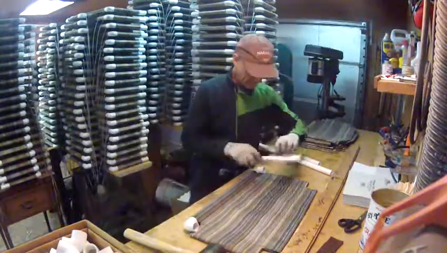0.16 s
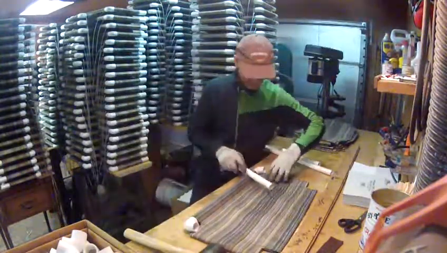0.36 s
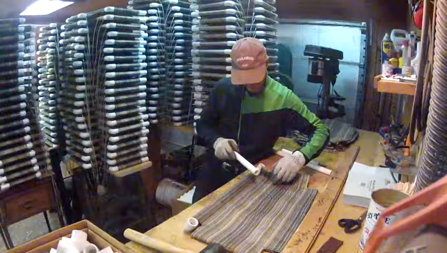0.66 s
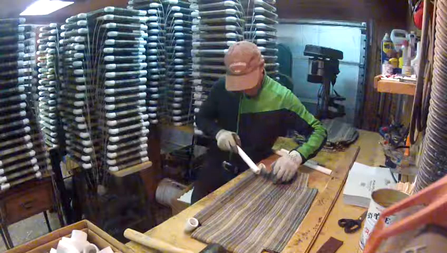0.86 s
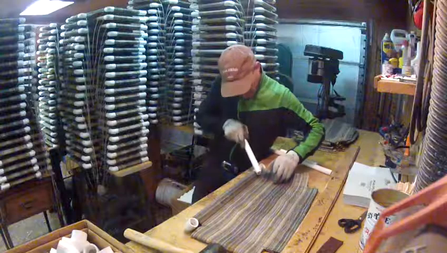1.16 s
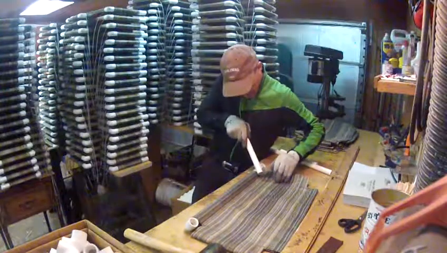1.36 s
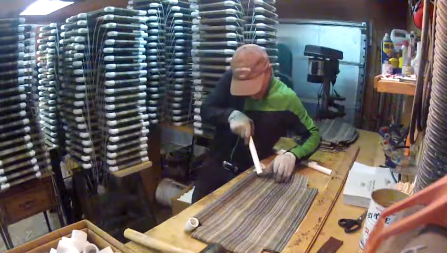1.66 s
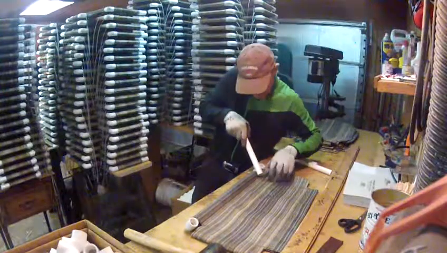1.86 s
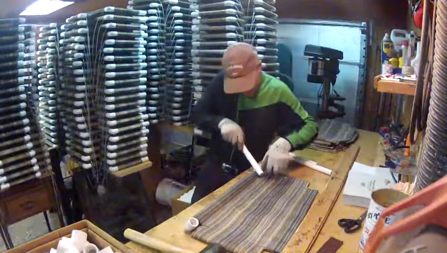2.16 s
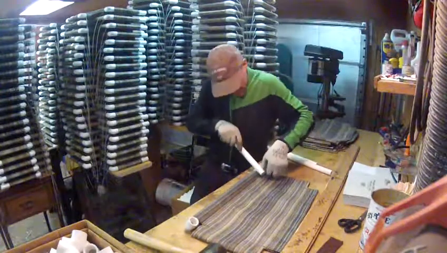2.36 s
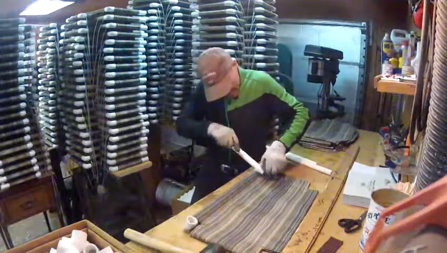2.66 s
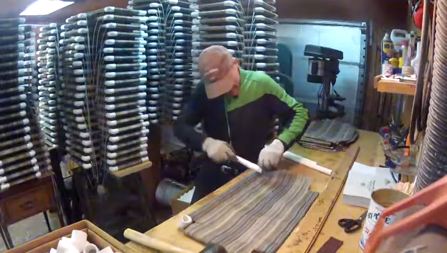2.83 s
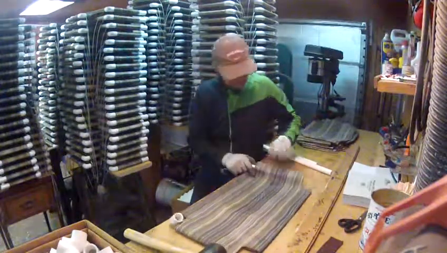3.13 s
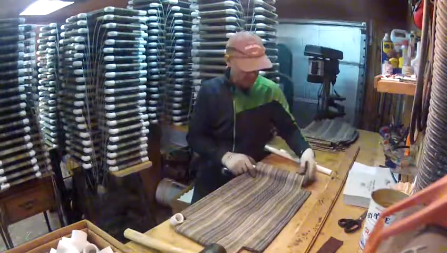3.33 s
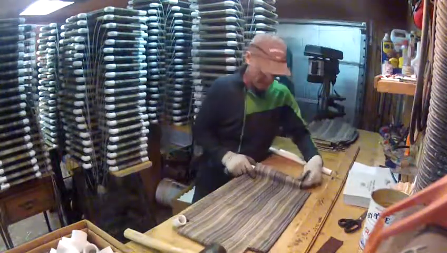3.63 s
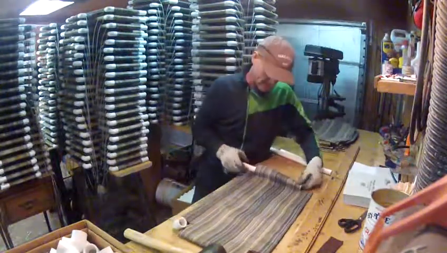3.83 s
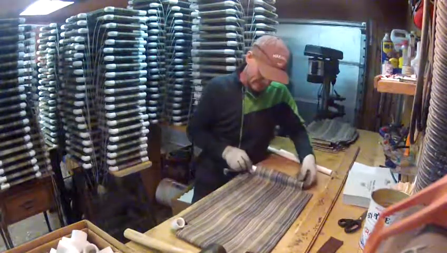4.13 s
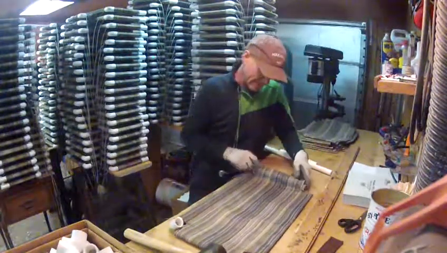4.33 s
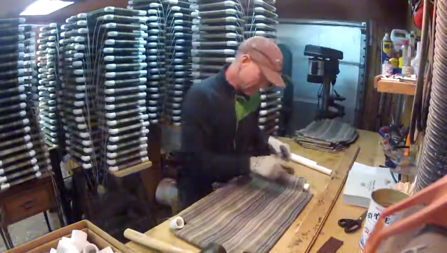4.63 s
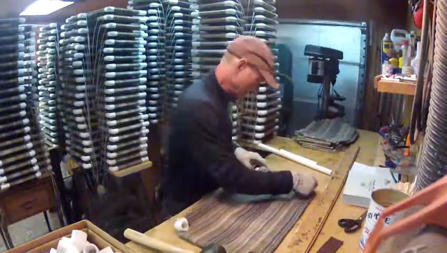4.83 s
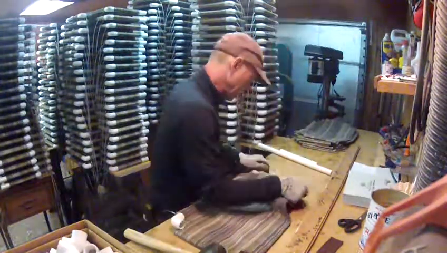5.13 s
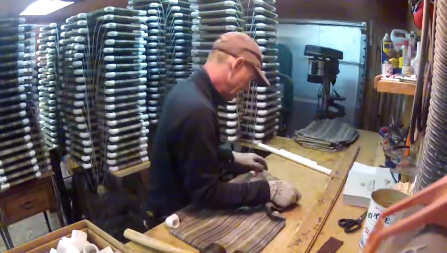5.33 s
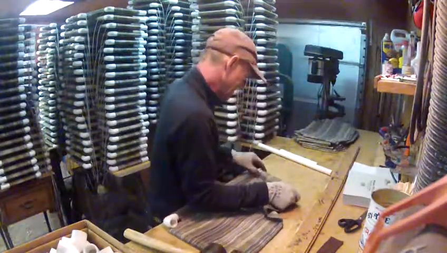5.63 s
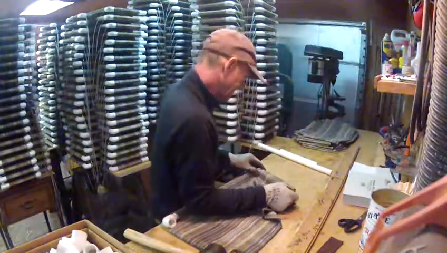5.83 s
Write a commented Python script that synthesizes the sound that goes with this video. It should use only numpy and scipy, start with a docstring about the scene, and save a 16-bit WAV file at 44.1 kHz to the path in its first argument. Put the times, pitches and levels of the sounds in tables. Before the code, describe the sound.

A small workshop with a faint low hum and soft hiss, heard through a cheap microphone with gritty, brittle treble and short room echoes. At 0.4 s a hollow plastic pipe hits a wooden bench in a loud, tight clatter, the strongest sound, followed by a weaker knock at 0.55 s. From 0.6 to 2.7 s it is mostly quiet: faint ticks, soft taps around 1.3 and 2.0 s, and a small click near 2.4 s. At about 2.8 s something drags over wood, and a brief hissy cloth swish at 2.9-3.0 s ends with a hollow knock. Small taps and rustles follow, with a woody tap at 3.8 s. At 4.1 s comes a sharp, loud plastic knock with a quick rebound. A thud at 4.8 s leads to a busy cluster at 5.05-5.2 s of hard clicks, a hollow clink, scraping and thumps. Light taps and shuffling continue to the end, near 6 s.

```python
"""Plastic pipes on a workbench

Plastic pipes are knocked, set down and pushed through a cloth sleeve on a wooden bench in a small workshop.
Each blow rings the planks, frame and pipe with a short burst of force, and ticks are snaps of noise.
Dragging, rustling and scraping are made of many tiny slips; hum and hiss lie below, and the hits echo.
A cheap camera samples slowly and holds each value, which adds mirrored treble.
"""
import sys
import numpy as np
from scipy import signal
from scipy.fft import rfft, irfft
from scipy.io import wavfile
from scipy.ndimage import uniform_filter1d

SR = 44100
rng = np.random.default_rng(int(sys.argv[2]) if len(sys.argv) > 2 else 0)


def transcribe(signal):
    """Save signal, clipped to [-1, 1], as a 16-bit WAV file at the path in sys.argv[1]."""
    frames = np.atleast_2d(signal).T
    limited = np.clip(frames, -1, 1)
    pcm = np.round(limited * 32767).astype(np.int16)
    wavfile.write(sys.argv[1], SR, pcm)


N = 264026  # length in samples


def gain_of(db):
    """Turns decibels into amplitude."""
    return 10 ** (np.asarray(db) / 20)


def evened(x):
    """Scales a sound to an rms of 1."""
    return x / np.sqrt(np.mean(x ** 2) + 1e-20)


def read(points, hz):
    """Reads a table of values over pitch at the pitches hz, in straight lines over log pitch."""
    pitch_hz, value = np.transpose(points)
    return np.interp(np.log(hz + 1), np.log(pitch_hz + 1), value)


def coloured(x, points):
    """Gives x a spectrum, keeping the energy of white input."""
    gain = gain_of(read(points, np.fft.rfftfreq(len(x), 1 / SR)))
    return irfft(rfft(x) * evened(gain), len(x))


def add(mix, start_s, sound):
    """Mixes a sound in at its start time."""
    part = mix[round(start_s * SR):][:len(sound)]
    part += sound[:len(part)]


def stroke(start_s, hold_s, level_db, rise_db_per_s, fall_db_per_s):
    """Loudness of one movement: it swells until its start, holds, then fades."""
    t = np.arange(N) / SR
    before_s = np.maximum(start_s - t, 0)
    after_s = np.maximum(t - start_s - hold_s, 0)
    return gain_of(level_db - rise_db_per_s * before_s - fall_db_per_s * after_s)


def grit(per_s, spread_db):
    """Sparse slips of uneven size and random direction."""
    size = gain_of(spread_db * np.minimum(rng.exponential(1, N), 5))
    direction = rng.choice([-1., 1.], N)
    happens = rng.random(N) < per_s / SR
    return evened(size * direction * happens)


def body(modes, weight=lambda hz: 1):
    """How a body rings after one sharp push: a sum of fading tones (modes)."""
    hz, level_db, t60_s = np.transpose(modes)[:, :, None]
    t = np.arange(SR // 4) / SR
    sign = (-1.) ** (np.arange(len(modes))[:, None] // 2)  # pairs of neighbours in opposite phase
    fading = gain_of(level_db - 60 * t / np.maximum(t60_s, .01))
    rings = sign * weight(hz) * fading * np.sin(2 * np.pi * hz * t)
    build_up = 1 - np.exp(-t * hz / 0.32)  # over about a cycle
    fade_out = np.cos(2 * np.pi * t)  # silent after a quarter second
    return (rings * build_up).sum(0) * fade_out / np.sqrt(len(modes))


def ring(force, modes):
    """A long force sets a body ringing."""
    return evened(signal.oaconvolve(force, body(modes))[:N])


# colour of the workshop hum and hiss: pitch_hz, level_db (per Hz, only the shape counts)
AIR_COLOUR = [(12, -27.5), (20, -8), (48, 4), (74, -5), (111, -4), (175, -11.5), (275, -12), (366, -18.5),
              (393, -49.5), (476, -11), (511, -28.5), (1460, -27.5), (2460, -33), (4690, -32.5),
              (5950, -46), (7740, -98), (13100, -120)]
AIR_DB = -57


def air():
    """The steady hum and hiss of the workshop: coloured noise that swells slightly."""
    swell = evened(uniform_filter1d(uniform_filter1d(rng.standard_normal(N), 6000), 6000))
    noise = evened(coloured(rng.standard_normal(N), AIR_COLOUR))
    return gain_of(AIR_DB + 0.27 * swell) * noise


# strokes of hands, pipe and cloth over the bench: start_s, hold_s, drag_db (on wood), rustle_db (of cloth)
STROKES = [(0.0, 0.16, -57, -65.5), (0.512, 0.023, -59, -62), (1.216, 0.11, -69, -73.5),
           (1.9, 0.16, -63, -80), (2.799, .17, -40, -65.5), (3.053, 0.015, -42.5, -83.5),
           (3.647, 0.032, -52.5, -68), (3.768, 0.033, -45, -57.5), (4.211, .17, -48, -63),
           (4.684, 0.11, -59.5, -70), (4.85, 0.31, -52.5, -65), (5.095, 0.078, -42, -64),
           (5.27, 0.087, -55.5, -90), (5.564, 0.12, -52, -71.5)]
# ringing of the bench planks: pitch_hz, level_db, t60_s (time to fade by 60 dB)
BENCH = [(205.5, -7, 0.097), (251.3, -9, 0.16), (274, 2.5, 0.092), (323.6, -4.5, 0.058), (365, -2.5, 0.063),
         (403.5, -3.5, 0.052), (470.4, -1, 0.065)]
# ringing of the bench frame: pitch_hz, level_db, t60_s
BOOM = [(52.2, -2.5, .17), (58.3, -3, 0.26), (90, -11.5, 0.027), (113, -5.5, 0.41), (152.7, -2, 0.12),
        (175, -8, 0.1215)]
# ringing of the hollow plastic pipe: pitch_hz, level_db, t60_s
PIPE = [(452.6, 8.5, .06), (519, 8.5, 0.048), (599, 1, 0.093), (644.4, 3.5, 0.042), (725.5, 4, 0.027),
        (795, 2, 0.03), (886, -4, .06), (888, -9.5, 0.031), (945, -6, 0.035), (1008, 1.5, 0.035),
        (1169, -4, .05), (1267, -3, 0.038), (1370, -2.5, 0.013), (1542, -5, 0.022), (1830, -10.5, .02),
        (2180, -10.5, 0.016), (2800, -16, .015)]
RISE_DB_PER_S, FALL_DB_PER_S = 243.5, 138
REST_DRAG_DB = -59  # between strokes


def drag():
    """Things drag over the wood: uneven slips shake the planks, the frame and the pipe."""
    slips = grit(per_s=900, spread_db=-3.5)
    effort = gain_of(REST_DRAG_DB)
    for start_s, hold_s, drag_db, _ in STROKES:
        effort = effort + stroke(start_s, hold_s, drag_db, RISE_DB_PER_S, FALL_DB_PER_S)
    return effort * evened(ring(slips, BENCH) + 1.02 * ring(slips, BOOM) + 0.44 * ring(slips, PIPE))


# colour of the cloth shifting about: pitch_hz, level_db (per Hz, only the shape counts)
WEAVE = [(500, -22.5), (1000, -2), (2000, -4), (3500, -6), (4700, -1.5), (5600, 0), (7000, -42)]
# colour of the cloth as the pipe is pushed into the sleeve: pitch_hz, level_db (per Hz, only the shape counts)
CLOTH = [(700, -22), (1200, -13), (2000, -16), (3000, -7), (3900, -10), (4400, -2), (4750, 2.5), (5100, -7),
         (5600, -1), (7000, -22)]
REST_RUSTLE_DB, CLOTH_FALL_DB_PER_S = -75.5, 60
# the push into the sleeve swells, holds and dies
SWISH_START_S, SWISH_HOLD_S, SWISH_DB = 2.918, 0.079, -34.5
SWISH_RISE_DB_PER_S, SWISH_FALL_DB_PER_S = 244.5, 234


def rustle():
    """Dense fibre slips make a hiss that flutters as the weave catches."""
    flutter = evened(uniform_filter1d(rng.standard_normal(N), 300))
    slips = grit(per_s=3600, spread_db=-3.0)
    push = stroke(SWISH_START_S, SWISH_HOLD_S, SWISH_DB, SWISH_RISE_DB_PER_S, SWISH_FALL_DB_PER_S)
    shift = gain_of(REST_RUSTLE_DB)
    for start_s, hold_s, _, rustle_db in STROKES:
        shift = shift + stroke(start_s, hold_s, rustle_db, RISE_DB_PER_S, CLOTH_FALL_DB_PER_S)
    cloth = push * evened(coloured(slips, CLOTH)) + shift * evened(coloured(slips, WEAVE))
    return gain_of(0.74 * flutter) * cloth


# small dry ticks of plastic and seams: start_s, level_db, pitch_hz
TICKS = [(0.13, -46.5, 3200), (0.566, -40.5, 4420), (0.6187, -48.5, 2330), (0.9075, -55.5, 1725),
         (0.9977, -58.5, 2070), (1.042, -57.5, 1534), (1.5633, -53.5, 4870), (1.867, -52, 1340),
         (2.808, -51.5, 4470), (3.3595, -64.5, 1360), (3.5671, -42, 1360), (4.071, -51, 2300),
         (4.1787, -42, 4420), (4.269, -43, 1410), (4.705, -50.5, 2500), (4.7517, -47, 1800),
         (5.0292, -35.5, 2660), (5.105, -45, 3300)]
# colour of hard, dry contact noise: pitch_hz, level_db (per Hz, only the shape counts)
TICK_COLOUR = [(710, -20.5), (1200, -21), (1630, -4.5), (2000, -6), (3280, -3), (3580, -3), (4960, -1.5),
               (5900, -4.5), (7670, -70.5), (13000, -120)]
SNAP_DB = -7.5  # noise of a tick against its ring
OVERTONE, OVERTONE_DB = 1.8, -5  # second tone of the ring: pitch ratio, level


def ticks():
    """Each tick is a snap of noise with a very short ring of the plastic."""
    tones, snap_train, t = np.zeros(N), np.zeros(N), np.arange(1200) / SR
    snaps = rng.standard_normal((len(TICKS), 1200))
    for (start_s, level_db, pitch_hz), snap in zip(TICKS, snaps):
        first = np.sin(2 * np.pi * pitch_hz * t)
        second = gain_of(OVERTONE_DB) * np.sin(2 * np.pi * OVERTONE * pitch_hz * t)
        add(tones, start_s, gain_of(level_db) * (first + second) * np.exp(-t / 0.00174))
        add(snap_train, start_s, gain_of(level_db + SNAP_DB) * snap * np.exp(-t / 0.0052))
    return tones + coloured(snap_train, TICK_COLOUR)


# how long the echoes last: pitch_hz, t60_s
ROOM = [(60, .3), (250, 0.31), (1000, 0.28), (3000, 0.25), (5500, 0.38)]
# echoes against the direct sound: pitch_hz, level_db
ECHO_COLOUR = [(60, -1.5), (300, -1), (1000, -2.5), (3000, -0.5), (5500, -5)]


def room(x):
    """Sparse reflections of random sign, each band dying at its own speed."""
    taps = np.zeros(SR)
    at = np.arange(200, SR - 20, 20) + rng.integers(0, 20, (SR - 201) // 20)  # one in every 20 samples
    taps[at] = rng.choice([-1., 1.], len(at))
    hz, t, bands = signal.stft(taps, SR, nperseg=256)
    t60_s = np.maximum(read(ROOM, hz), .05)[:, None]
    tail = signal.istft(bands * gain_of(-60 * t / t60_s), SR, nperseg=256)[1]
    echoes = rfft(signal.fftconvolve(x, tail / np.linalg.norm(tail))[:N])
    return irfft(echoes * gain_of(read(ECHO_COLOUR, np.fft.rfftfreq(N, 1 / SR))), N)


def near(centre_hz, octaves):
    """The struck spot favours the modes close to one pitch."""
    return lambda hz: 0.57 + 1.85 * np.exp(-(np.log2(hz / centre_hz) / octaves) ** 2)


# blows on the bench: start_s, thud_db (planks), boom_db (frame), tone_db (hollow pipe), crack_db (pipe),
# tick_db (hard contact), frame_hz (favoured frame pitch)
KNOCKS = [(0.3934, -23, -47, -25, -34, -25, 60), (0.397, -10, -15, -12, -0.5, -12, 41.3),
          (0.402, -10.5, -15, -12, -33, -22, 40.2), (0.425, -13.5, -20.5, -15.5, -11, -37, 50.5),
          (0.549, -19, -27, -23.5, -21.5, -24, 46.7), (0.558, -23, -46, -40, -39, -27, 48),
          (0.847, -45.5, -48, -74, -75, -55, 153), (1.31, -28, -55, -34.5, -48, -46, 118),
          (1.958, -31, -56, -38.5, -45.5, -32.5, 65), (2.022, -42.5, -50, -64, -46, -38.5, 113),
          (2.376, -36, -53.5, -47.5, -43, -25, 105), (2.748, -45, -56, -45.5, -66, -36, 48),
          (2.997, -37, -25, -18.5, -21.5, -15.5, 82), (3.019, -22.5, -30, -51, -60, -36, 113),
          (3.634, -40, -64, -61, -49, -36, 143), (3.664, -33.5, -40, -68, -56, -50, 43.2),
          (3.795, -36, -39, -34, -52, -26, 120), (3.804, -18, -36, -25, -58, -19, 189),
          (3.811, -21.5, -30.5, -36, -32.5, -37, 120), (3.847, -60, -26, -39, -77, -51, 113),
          (4.08, -20, -21.5, -13.5, -6.5, -13, 175), (4.11, -20.5, -24.5, -21, -27, -26, 144),
          (4.139, -29, -43, -55, -60, -51.5, 165), (4.241, -27, -31.5, -50, -46, -29.5, 175),
          (4.387, -37.5, -44, -71, -59, -41, 57.7), (4.642, -40.5, -38.5, -44.5, -50.5, -46, 177),
          (4.798, -22, -24, -40, -36.5, -33, 113), (4.839, -44, -36, -42, -64, -52, 114),
          (4.871, -35, -44, -40, -64, -39, 108), (5.049, -30, -45, -46, -25, -12, 156),
          (5.12, -23, -42, -26, -22, -23, 65), (5.142, -15.5, -27, -32.5, -35, -19.5, 118),
          (5.188, -52, -33.5, -35, -64, -34, 118), (5.388, -32.5, -69, -26, -33, -37, 172),
          (5.406, -27, -35, -37, -66, -25, 54), (5.435, -39.5, -36, -38, -54, -52, 161),
          (5.534, -39.5, -63, -36, -65, -38, 185), (5.574, -28.5, -49, -74, -72, -36.5, 115),
          (5.642, -28, -34, -41, -40, -34, 127), (5.658, -32.5, -47.5, -50, -43, -21, 108),
          (5.721, -43, -44, -55, -61, -55, 108), (5.925, -38, -40, -51, -41, -28.5, 193),
          (5.954, -36, -35, -38.5, -33.5, -22.5, 87.5)]
# the work moves along the bench: time_s, plank_hz (favoured plank pitch)
SPOT = [(0, 354.3), (2.4, 350), (2.75, 259), (5.75, 257), (5.9, 316)]
CHATTER_S, TICK_S, RATTLE_S = 0.0055, .0028, 0.016  # time constants of the fading contact noises
RATTLE_SHARE, TICK_RATTLE_SHARE = 0.47, 0.7  # the loose pipe keeps rattling after the contact


def knocks():
    """A clean contact and a short chatter drive planks, frame and pipe; hard contact adds a tick."""
    out, tick = np.zeros((2, N))
    t = np.arange(4000) / SR
    chance = rng.standard_normal((len(KNOCKS), 3, 4000))
    for (start_s, thud_db, boom_db, tone_db, crack_db, tick_db, frame_hz), noise in zip(KNOCKS, chance):
        force = noise * np.exp(-t / np.array([[CHATTER_S], [TICK_S], [RATTLE_S]]))
        chatter, snap, rattle = force / np.linalg.norm(force, axis=1)[:, None]
        contact = .5 * chatter + (t == 0)
        plank_hz = np.interp(start_s, *np.transpose(SPOT))
        planks = gain_of(thud_db) * body(BENCH, near(plank_hz, 0.32))
        frame = gain_of(boom_db) * body(BOOM, near(frame_hz, 0.42))
        # the pipe's level slides from tone to crack between 680 and 1250 Hz
        pipe = body(PIPE, lambda hz: gain_of(read([(680, tone_db), (1250, crack_db)], hz)))
        wood_sound = signal.fftconvolve(planks + frame, contact)
        pipe_sound = signal.fftconvolve(pipe, contact + RATTLE_SHARE * rattle)
        add(out, start_s, wood_sound + pipe_sound)
        # the hard core meets last
        add(tick, start_s + 0.0016, gain_of(tick_db) * (snap + TICK_RATTLE_SHARE * rattle))
    return out + coloured(tick, TICK_COLOUR)


# a hollow fitting is clinked: start_s, level_db
CLINKS = [(5.05, -36), (5.1061, -31), (5.1484, -43), (5.192, -53)]
# ringing of the fitting: pitch_hz, level_db, t60_s
FITTING = [(1023, 2.5, 0.16), (3500, 7, 0.018), (4850, 3.5, 0.039)]


def clinks():
    """Each clink lets the hollow fitting ring freely."""
    out = np.zeros(N)
    for start_s, level_db in CLINKS:
        add(out, start_s, gain_of(level_db) * body(FITTING))
    return out


# pipe ends scraping over the wood, each a sudden start that fades: start_s, level_db, t60_s
SCRAPES = [(5.05, -30.5, 0.034), (5.103, -32.5, 0.16), (5.639, -48, 0.11), (5.659, -55, 0.072)]
SCRAPE_RISE_DB_PER_S = 4487


def scrapes():
    """Coarse slips, a few much bigger than the rest, with the colour of hard contact."""
    push = sum(stroke(start_s, 0, level_db, SCRAPE_RISE_DB_PER_S, 60 / t60_s)
               for start_s, level_db, t60_s in SCRAPES)
    return push * evened(coloured(grit(per_s=3500, spread_db=3.0), TICK_COLOUR))


def scene():
    """Blows, clinks and ticks with their echoes, over drag, rustle, scrapes and hum."""
    hits = knocks() + clinks() + ticks()
    return (hits + room(hits) + drag() + rustle() + scrapes() + air())[None]


HOLD_HZ, EDGE_HZ = 12000, 15400  # slow sampling rate, upper edge of the sound


def record(dry):
    """Slow sampling with held values: the sound is mirrored around the sampling rate and droops as a sinc."""
    # the microphone drops the deepest bass
    dry = signal.sosfilt(signal.butter(4, 40, "high", fs=SR, output="sos"), dry)
    smoothing = signal.firwin(61, 5500, window=("kaiser", 6), fs=SR)
    smooth = signal.oaconvolve(dry, smoothing[None], "same")
    mirrored = smooth * (1 + 2 * np.cos(2 * np.pi * HOLD_HZ * np.arange(N) / SR))
    held = irfft(rfft(mirrored) * np.sinc(np.fft.rfftfreq(N, 1 / SR) / HOLD_HZ), N)
    edge = signal.firwin(511, EDGE_HZ, window=("kaiser", 9), fs=SR)
    return signal.oaconvolve(held, edge[None], "same")


dry = scene()
out = record(dry)
transcribe(out)
```